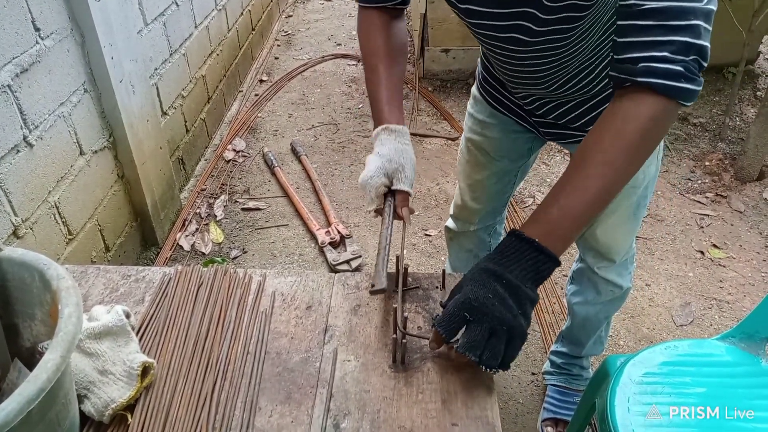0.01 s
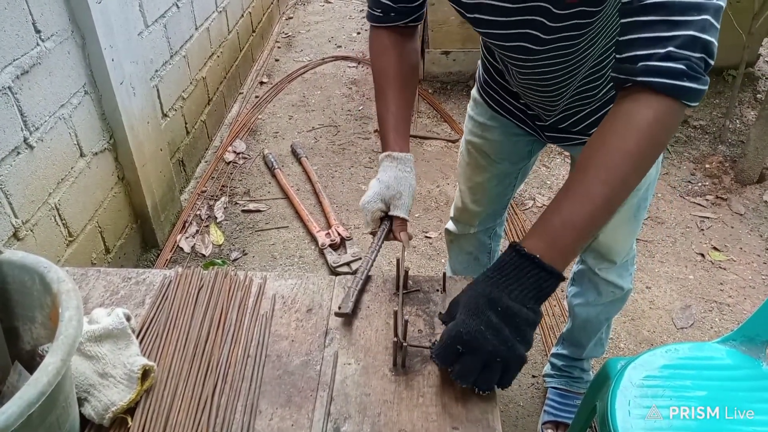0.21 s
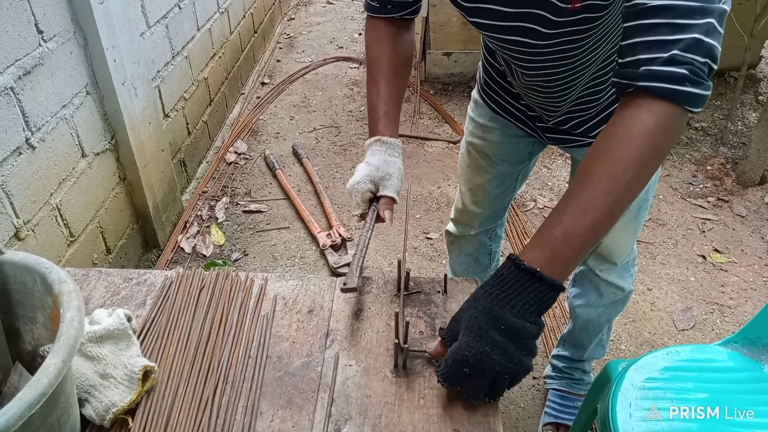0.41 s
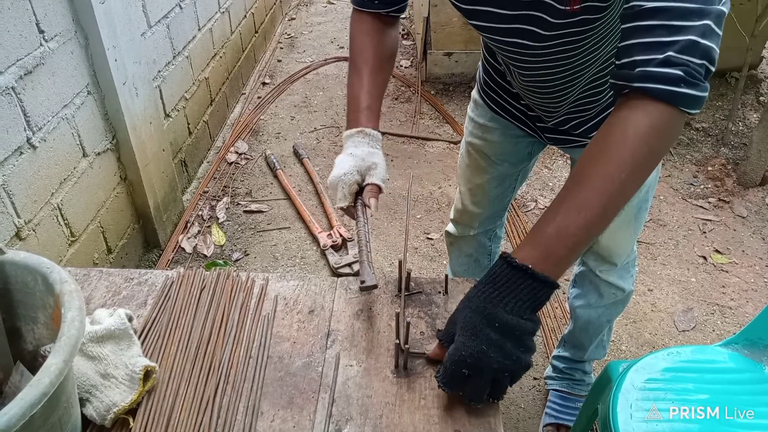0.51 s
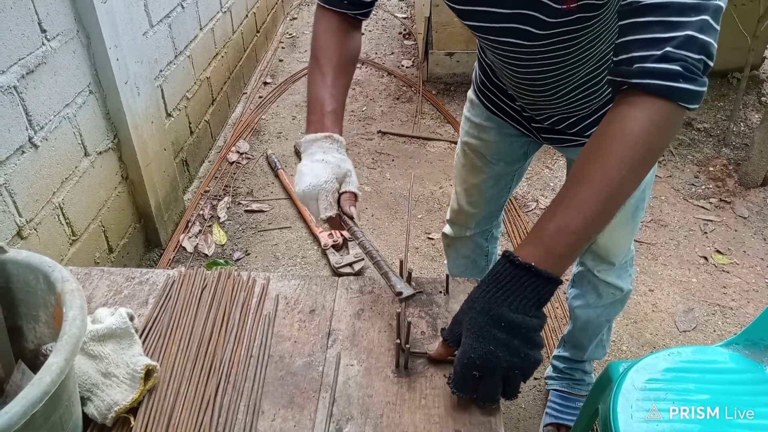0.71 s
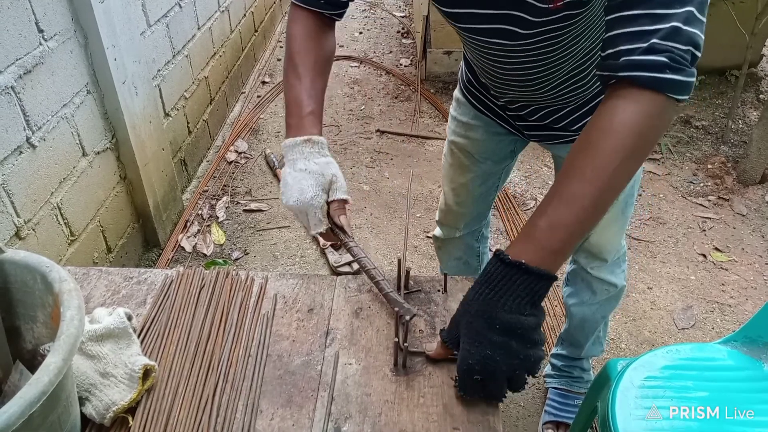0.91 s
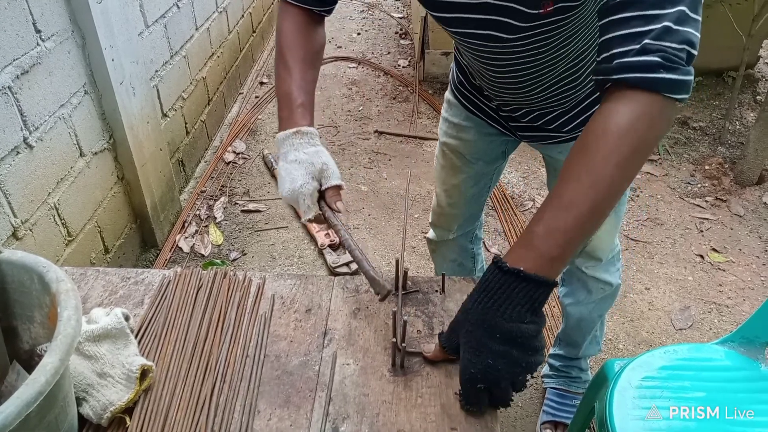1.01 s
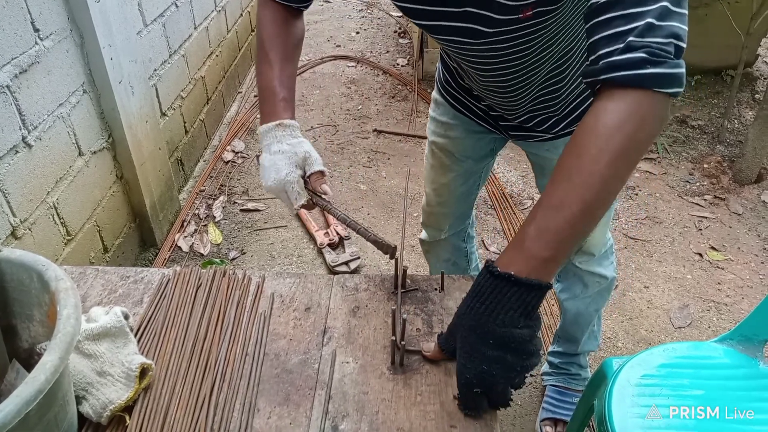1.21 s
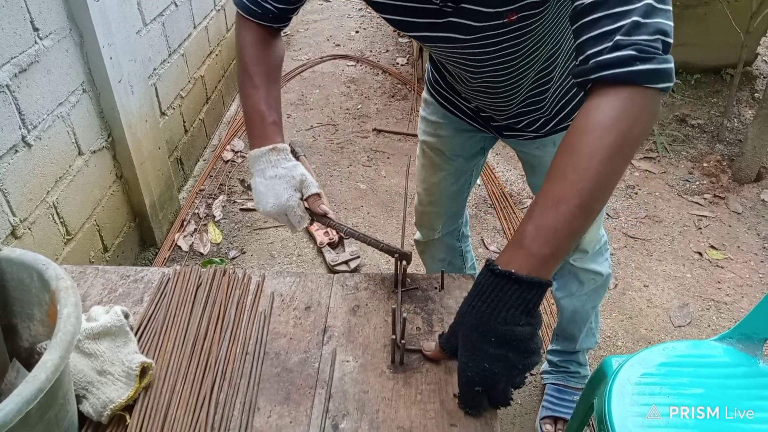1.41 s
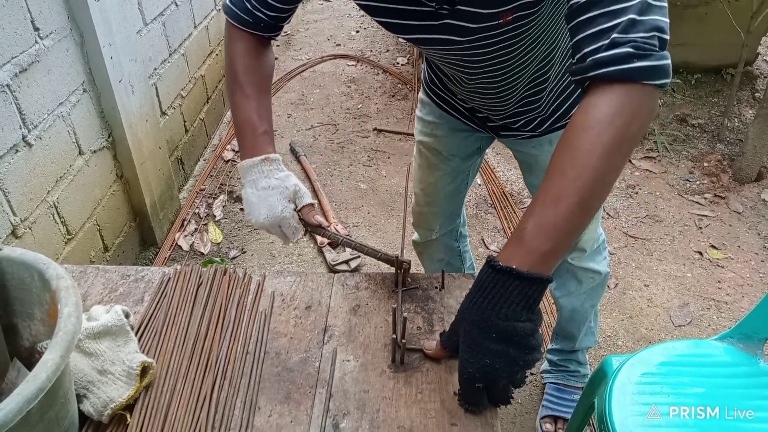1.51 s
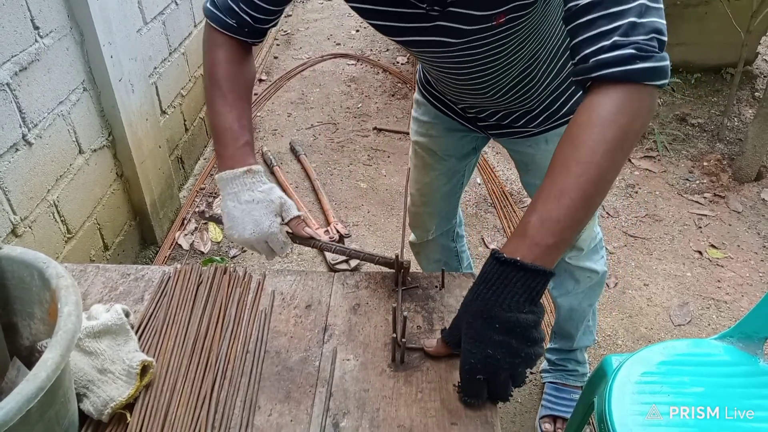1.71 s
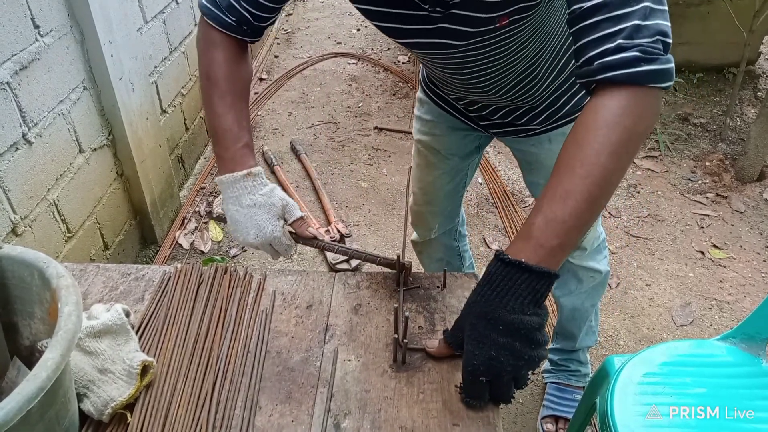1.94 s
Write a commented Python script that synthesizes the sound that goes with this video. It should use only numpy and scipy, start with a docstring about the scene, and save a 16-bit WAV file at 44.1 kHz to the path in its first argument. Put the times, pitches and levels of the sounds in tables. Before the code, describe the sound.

Steel clinks on a wooden bench outdoors, heard close. A thin bar scrapes and squeaks softly at first, then a heavy dull thump lands at 0.2 seconds and a lighter wooden knock near 0.55. A bright clank rings at 0.85, a short tap at 1.25, then bouncing clinks from 1.45 run into a dense rattle around 1.6 to 1.65. Faint uneven hiss, low hum, tiny distant whistles and weak echo.

```python
"""At a wooden bench outdoors, a steel bending key is fitted onto a thin reinforcing bar between pins.
The key clinks, is tapped, bounces on a pin and rattles home: fading sine tones plus bursts of noise.
The bar slides and thumps on the bench: uneven noise, gliding squeaks and dull wooden tones.
Behind lie a weak echo, low air noise, a hiss whose level dips and recovers, a wavering low hum
and faint whistles."""
import sys
import numpy as np
from scipy import signal
from scipy.fft import rfft, irfft, next_fast_len
from scipy.io import wavfile
from scipy.ndimage import uniform_filter1d, minimum_filter1d, map_coordinates

SR = 44100
rng = np.random.default_rng(int(sys.argv[2]) if len(sys.argv) > 2 else 0)


def unload_audio(sound):
    """Save the sound as a 16-bit wav file, at the path given as the first command line argument."""
    columns = np.transpose(np.atleast_2d(sound))
    # keep every value between -1 and 1, then stretch to whole-number steps
    steps = np.round(np.clip(columns, -1, 1) * 32767)
    wavfile.write(sys.argv[1], SR, steps.astype(np.int16))


N = 85995  # samples in the scene

# dull thud of the bench, under steel contacts and wood blows alike: [f/Hz, relative level per Hz/dB]
THUD = [(25, -44), (55, -36), (110, -14.5), (200, -3.5), (470, -4), (560, -23.5), (640, -7), (850, -11.5),
        (1200, -16.5), (1800, -10.5), (3400, -13.5), (4500, -32), (7000, -66), (15000, -67)]
THUD_RISE_S = 0.0005


def amp(db):
    """Turn decibels into a gain."""
    return 10 ** (np.asarray(db) / 20)


def unit(x):
    """Scale a sound to an rms of 1."""
    return x / np.sqrt(np.mean(x ** 2) + 1e-20)


def along(points, hz):
    """Read a curve of (Hz, value) points on a log frequency axis."""
    f, v = np.transpose(points)
    return np.interp(np.log(hz + 1), np.log(f + 1), v)


def filtered(x, response):
    """Multiply the spectrum of x by a response that depends on frequency."""
    size = next_fast_len(len(x) + 8192)
    hz = np.fft.rfftfreq(size, 1 / SR)
    return irfft(rfft(x, size) * response(hz), size)[:len(x)]


def noise(spectrum, size):
    """Colour white noise with a spectrum and scale it to an rms of 1."""
    white = rng.standard_normal(size)
    return unit(filtered(white, lambda hz: amp(along(spectrum, hz))))


def wobble(rate):
    """A smooth random curve through `rate` random points a second."""
    knots = rng.standard_normal(4096)
    return map_coordinates(knots, [np.arange(N) * rate / SR], mode="wrap")


def add(track, s, sound):
    """Mix a sound into the track at s seconds."""
    part = track[max(0, round(s * SR)):][:len(sound)]
    part += sound[:len(part)]


def fade(t60, rise, hold=0):
    """Half a second of fast rise, brief hold and exponential decay (60 dB in t60 seconds)."""
    t = np.arange(SR // 2) / SR
    decay = np.exp(-np.log(1000) * np.maximum(t - hold, 0) / t60)
    return decay * (1 - np.exp(-t / rise))


def ring(modes, length, disorder):
    """A struck body rings in fading sine tones; disorder (0-1) scatters their starting phases."""
    rise_s, scatter_db = 0.00066, 3.1  # each blow excites the modes a little differently
    t = np.arange(SR // 2) / SR
    out = np.zeros(SR // 2)
    for k, (hz, db, t60) in enumerate(modes):
        level = (-1) ** k * amp(db + scatter_db * rng.standard_normal())  # signs alternate
        wave = np.sin(2 * np.pi * (hz * t + disorder * rng.random()))
        out += level * fade(t60 * length, rise_s) * wave
    return out


def burst(spectrum, t60, rise):
    """Noise stands for crowded modes, fed while the contact chatters; the treble dies first."""
    chatter_s = 0.0018
    treble_hz, treble_life = 4450, 0.69  # crossover; share of the t60 that is left above it
    crowd = noise(spectrum, size=SR // 2)
    treble = filtered(crowd, lambda hz: 1 - 1 / (1 + (hz / treble_hz) ** 10))
    low_part = (crowd - treble) * fade(t60, rise, hold=chatter_s)
    return low_part + treble * fade(t60 * treble_life, rise, hold=chatter_s)


def tone(length, hz, sag, jitter):
    """A wavering tone that swells and fades; its pitch sinks by the share `sag` a second."""
    flutter_db, flutter_per_s = 3.2, 72.4
    t = np.arange(SR // 2) / SR
    pitch = hz * (1 - sag * t + jitter * wobble(150)[:len(t)])
    swell = np.sqrt(np.abs(np.sin(np.pi * np.clip(t / length, 0, 1))))
    flutter = amp(flutter_db * wobble(flutter_per_s)[:len(t)])
    return np.sqrt(2) * swell * flutter * np.sin(2 * np.pi * np.cumsum(pitch) / SR)


def tones(rows, sag, jitter):
    """Place all the short tones of one table at their times."""
    out = np.zeros(N)
    for s, length, hz, db in rows:
        add(out, s, amp(db) * tone(length, hz, sag, jitter))
    return out


def steel():
    """Each contact rings a steel part, with one frequency in focus, and jolts the bench under it."""
    # ringing of bar, key and pin, and of all pressed together on the bench as one jig,
    # before each contact adjusts it: [f/Hz, level/dB, t60/s]
    bar = [(322.3, -14.5, 0.22), (483, -13.5, 0.16), (958, -28.5, 0.36), (1039, -15, 0.14),
           (1332, -13, 0.11), (1748, -15, 0.18), (2040, -20.5, 0.22), (2350, -18.5, 0.15),
           (2998, 1.5, 0.15), (3173, -17, 0.086), (3250, -20, 0.31), (3556, -16, .13), (3630, -13, .15),
           (3765, -5, 0.15), (4710, -18.5, 0.083), (9250, -45, .17)]
    key = [(700.4, -5, 0.16), (758, -11.5, 0.27), (786, -18.5, 0.35), (1740, -3, 0.099), (2263, -1, 0.086),
           (2163, -17.5, 0.17), (2627, 1, 0.091), (2684, 4, 0.098), (3530, 1, 0.07), (3670, -5, .06),
           (3980, -10.5, .05), (4210, -4.5, 0.032), (4840, -15, 0.1), (6750, -29, 0.12),
           (9110, -36.5, 0.11), (11550, -26, 0.12), (14360, -35.5, .11)]
    pin = [(804.6, -15, 0.25), (1362, -21.5, 0.16), (1690, -14.5, 0.099), (1973, -10, .14),
           (1970, -25.5, 0.097), (2126, -11, 0.12), (2204, -1, 0.069), (2304, -6, 0.038), (2850, 0, 0.089),
           (2970, -6.5, 0.077), (3263, -2.5, 0.085), (3300, -2, .07), (3460, -7.5, .06), (4062, 3.5, 0.044),
           (4087, 0, 0.057)]
    jig = [(148, -13.5, 0.17), (281, -6, 0.29), (420, -14, 0.097), (774.6, -7.5, 0.15), (938, -4, .07),
           (997, -1.5, 0.05), (1357, -8, 0.16), (1425, -21, .24), (1794, 1.5, .09), (2300, -17, .15),
           (2583, -2.5, .065), (3320, -10, .07), (3520, 1, 0.13), (3711, -3, 0.088), (4060, 0.5, 0.044)]
    # dense short clatter of the same parts, before the focus: [f/Hz, relative level per Hz/dB]
    bar_clatter = [(50, -54), (150, -32), (600, -19.5), (850, -5), (1200, -17), (1800, -11.5), (2700, 1),
                   (3600, 3), (4400, -12), (5300, -30), (7000, -34), (8500, -41), (12500, -40.5),
                   (14500, -53), (15600, -61.5)]
    key_clatter = [(50, -52), (150, -29), (600, -28.5), (850, -9.5), (1250, -23.5), (1800, -9.5),
                   (2600, 2.5), (3200, 0), (4200, 7.5), (5300, -22.5), (7200, -41.5), (8500, -34),
                   (11500, -35), (14500, -42.5), (15600, -61.5)]
    pin_clatter = [(50, -56.5), (170, -54), (330, -11.5), (480, -10.5), (620, -35), (850, -10),
                   (1300, -22.5), (2100, 1.5), (2550, -4.5), (3100, 2), (3750, -8), (4200, -5), (4700, -18),
                   (5200, -15.5), (5700, -34.5), (6500, -24), (8500, -39.5), (11500, -45.5), (15500, -58)]
    jig_clatter = [(60, -39), (140, -10.5), (480, 7), (560, -12.5), (640, -33.5), (760, -2), (960, 2.5),
                   (1100, -11.5), (1230, -41), (1330, -6), (1520, -19), (1760, -4.5), (2150, -7), (3500, 2),
                   (4150, -8), (4900, -21.5), (5700, -33), (6700, -31.5), (8400, -53), (9400, -41.5),
                   (12000, -52.5), (15500, -57)]
    # steel contacts: [t/s, part, ring level/dB, clatter level/dB, clatter t60 below the treble/s,
    # bench thud level/dB, ring length/share, focus f/Hz, drop away from the focus/dB per octave]
    contacts = [(0.486, "key", -49, -37.5, 0.074, -43, 1, 3500, -4),
                (0.8393, "bar", -11.5, -12, 0.11, -23.5, 0.97, 3200, 0),
                (0.8481, "bar", -40, -18.5, 0.17, -26.5, 0.66, 3200, 0),
                (1.2638, "key", -12, -9.5, 0.052, -24, 0.7, 3300, -0.5),
                (1.4505, "pin", -12, -14.5, 0.1, -37, 0.8, 2420, -2),
                (1.4946, "pin", -21, -22, 0.13, -36.5, 0.88, 3840, -2),
                (1.5228, "pin", -27.5, -25.5, 0.13, -38, .7, 3290, 6),
                (1.5445, "pin", -21, -20.5, 0.1, -37, 0.84, 2550, 6),
                (1.6022, "jig", -21, -25.5, 0.095, -21, 0.53, 3000, 2.5),
                (1.6112, "jig", -25.5, -17.5, 0.076, -34.5, .8, 3200, 4.5),
                (1.617, "jig", -25.5, -13, 0.16, -26.5, 1, 2000, 2),
                (1.6335, "pin", -16, -27, .06, -43.5, 1.4, 3150, 12.5),
                (1.6378, "jig", -21.5, -36, 0.042, -30, 0.69, 3000, 3),
                (1.646, "jig", -18, -16, 0.04, -35, 0.55, 2500, 3.5),
                (1.6538, "jig", -20.5, -15, 0.11, -25, 1.18, 3000, 0)]
    parts = {"bar": (bar, bar_clatter), "key": (key, key_clatter),
             "pin": (pin, pin_clatter), "jig": (jig, jig_clatter)}

    def focused(table, centre_hz, focus_db):
        """Lower the levels by focus_db per octave away from the centre; a negative value lifts them."""
        return [(hz, db - focus_db * abs(np.log2(hz / centre_hz)), *rest) for hz, db, *rest in table]

    out = np.zeros(N)
    for s, part, ring_db, clatter_db, t60, thud_db, length, centre_hz, focus_db in contacts:
        modes, spectrum = (focused(table, centre_hz, focus_db) for table in parts[part])
        ringing = amp(ring_db) * ring(modes, length, disorder=1)
        clatter = amp(clatter_db) * burst(spectrum, t60, rise=0.00013)
        jolt = amp(thud_db) * burst(THUD, t60=0.13, rise=THUD_RISE_S)
        add(out, s, ringing + clatter + jolt)
    return out


def wood():
    """Dull blows on the bench top: a soft push, its low modes and a thud."""
    # the bench, and its top knocked lightly at another spot,
    # before each blow adjusts it: [f/Hz, level/dB, t60/s]
    bench = [(146, -2.5, 0.053), (212.4, -11, 0.098), (320, -4.5, 0.092), (340, -4.5, 0.12),
             (420.3, 1.5, 0.083), (475.2, -4, 0.13), (767, -16, 0.23), (864, -13.5, .09), (917, -8.5, 0.1)]
    plank = [(320, 4, 0.057), (346.5, -0.5, 0.16), (812, -8, 0.043), (936, -5.5, 0.057), (1120, -26, 0.12),
             (1288, -9, 0.042), (1556, -18, 0.073), (2110, -28, 0.21), (3106, -20, .09)]
    # blows: [t/s, part, ring level/dB, thud level/dB, thud t60 below the treble/s,
    # ring length/share, push level/dB]
    knocks = [(0.2094, "bench", -12, -19, 0.17, .95, -2.5), (.2245, "bench", -27.5, -16.5, 0.074, .8, -31),
              (.5615, "plank", -15.5, -31, 0.16, 0.88, -27), (.664, "plank", -48, -46.5, 0.2, .8, -54)]
    parts = {"bench": bench, "plank": plank}
    push_s = 0.00105  # time scale of the push
    u = np.arange(SR // 2) / SR / push_s - np.pi
    push = (1 - 2 * u * u) * np.exp(-u * u)  # one smooth hump with a dip on each side
    out = np.zeros(N)
    for s, part, ring_db, thud_db, t60, length, push_db in knocks:
        ringing = amp(ring_db) * ring(parts[part], length, disorder=0)
        thud = amp(thud_db) * burst(THUD, t60, THUD_RISE_S)
        add(out, s, ringing + thud + amp(push_db) * push)
    return out


def sliding():
    """Uneven slips rasp on the wood, crush sand grains and make the bar sing faintly."""
    # strokes of the bar: [start t/s, length/s, rasp level/dB, squeal level/dB]
    slides = [(0, 0.11, -40.5, -37), (0.105, 0.1, -45, -43.5), (0.18, 0.062, -35.5, -32.5),
              (0.293, 0.056, -41.5, -62), (0.479, 0.045, -42, -47), (0.509, 0.041, -35, -59),
              (0.661, .02, -45, -60), (0.801, 0.033, -53.5, -54), (0.946, 0.11, -45, -48)]
    # colour of the rasp: [f/Hz, relative level per Hz/dB]
    rasp_colour = [(80, -40.5), (200, -6.5), (450, 3), (620, 0.5), (850, 4), (1300, -1), (2200, -5),
                   (3500, -3.5), (4500, -28.5), (6000, -33), (10000, -53), (15000, -44)]
    # resonances of the singing bar: [f/Hz, width/Hz, relative level/dB]
    resonances = [(2150, 250, -15), (2710, 130, -8.5), (3056, 162, -5.5), (3564, 201, -2), (3690, 122, -1),
                  (4255, 295, -15.5)]
    rise_s, fall_s = 0.012, 0.04  # the fall is centred on the end of the stroke
    slips_per_s, slip_db = 130, 2
    grit_per_s, grit_db = 130, -12  # crushed grains, level against the rasp
    t = np.arange(N) / SR
    slips = amp(slip_db * wobble(slips_per_s))
    grains = (rng.random(N) < grit_per_s / SR) * rng.standard_normal(N)
    grit = unit(filtered(grains, lambda hz: amp(along(rasp_colour, hz))))
    rasp = unit(slips * noise(rasp_colour, size=N)) + amp(grit_db) * grit

    def body(f):
        """Sum the bar's resonances, with alternating signs."""
        return sum((-1) ** k * amp(db) * 1j * f * width / (centre * centre - f * f + 1j * f * width)
                   for k, (centre, width, db) in enumerate(resonances))

    squeal = unit(filtered(slips * rng.standard_normal(N), body))
    out = np.zeros(N)
    for s, length, rasp_db, squeal_db in slides:
        start = np.clip((t - s) / rise_s, 0, 1)
        stop = np.clip((s + length - t) / fall_s + .5, 0, 1)
        out += start * stop * (amp(rasp_db) * rasp + amp(squeal_db) * squeal)
    return out


def squeaks():
    """The sliding bar squeaks; the pitches sink as its free end grows."""
    # squeaks: [start t/s, length/s, starting f before jitter/Hz, level before swell and flutter/dB]
    rows = [(0, .11, 3060, -40), (0, .105, 3760, -38), (.003, .035, 3600, -34), (.04, .04, 4360, -46),
            (.095, .08, 2850, -42), (.13, .065, 1375, -41), (.11, .08, 5310, -58), (.095, .12, 2005, -42)]
    return tones(rows, sag=.25, jitter=.008)  # shares of the pitch; sag is per second


def yard(x):
    """A short echo from the walls: fading noise that dies at a different speed in each band."""
    # echo decay: [f/Hz, t60/s]
    decay = [(150, 0.17), (1000, 0.32), (3000, 0.28), (10000, .12)]
    hz, t, bands = signal.stft(rng.standard_normal(SR // 2), SR, nperseg=256)
    fading = bands * np.exp(-np.log(1000) * t / along(decay, hz)[:, None])
    tail = signal.istft(fading, SR, nperseg=256)[1]
    return signal.fftconvolve(x, tail / np.linalg.norm(tail))[:N]


def air():
    """Low air noise: steady noise, mostly bass."""
    # colour of the air noise: [f/Hz, relative level per Hz/dB]
    colour = [(20, -42), (48, -17), (66, 6.5), (102, -7), (135, -4), (200, -5.5), (270, -17.5), (341, -3),
              (394, -25.5), (472, -11.5), (600, -18.5), (1000, -28.5), (1500, -31.5), (2200, -15),
              (3300, -74.5)]
    return amp(-50.5) * noise(colour, size=N)


def swelling_hiss():
    """Hiss whose level dips and recovers, with a steady fizz on top: two layers of coloured noise."""
    # colours of the changing hiss and the steady fizz: [f/Hz, relative level per Hz/dB]
    hiss_colour = [(820, -75), (1400, -45), (1820, -25.5), (1910, -5.5), (2050, -18), (2200, -0.5),
                   (2640, -8), (3130, 1), (3990, -3), (5180, -37), (5610, -22.5), (6330, -41), (6930, -20),
                   (7820, -26.5), (8480, -70), (10700, -50.5), (11700, -34), (12700, -52), (15500, -48.5)]
    fizz_colour = [(1000, -31.5), (3500, 5.5), (5200, -10.5), (7200, -2), (8500, -31), (10800, -33),
                   (12000, -12), (13000, -24), (14000, -16), (15500, -25)]
    # dips and recoveries of the hiss: [t/s, level/dB]
    hiss_level = [(0, -46.5), (.3, -46), (.44, -43), (.6, -45), (.7, -55.5), (.78, -58.5), (.84, -64),
                  (.95, -48), (1.1, -49.5), (1.24, -44), (1.32, -40), (1.42, -50), (1.58, -48.5),
                  (1.72, -46.5), (1.85, -43.5), (1.95, -44.5)]
    t = np.arange(N) / SR
    level = amp(np.interp(t, *np.transpose(hiss_level)))
    return level * noise(hiss_colour, size=N) + amp(-60.5) * noise(fizz_colour, size=N)


def hum():
    """A low tone and its octave waver together in pitch and loudness."""
    hum_hz, first_db, octave_db = 67.1, -55.5, -57.5  # middle pitch; levels before the wavering
    t = np.arange(N) / SR
    phase = 2 * np.pi * hum_hz * t + 0.78 * wobble(7.22)
    loudness = np.sqrt(2) * amp(2.6 * wobble(3.7))
    return loudness * (amp(first_db) * np.sin(phase) + amp(octave_db) * np.sin(2 * phase))


def whistles():
    """Faint thin whistles far off: short tones that sink slightly."""
    # whistles: [start t/s, length/s, starting f before jitter/Hz, level before swell and flutter/dB]
    rows = [(.22, 0.11, 5560, -62), (.31, 0.039, 5700, -64), (.93, 0.23, 5860, -62.5),
            (1.66, 0.093, 5850, -65)]
    return tones(rows, sag=.09, jitter=.003)  # shares of the pitch; sag is per second


def scene():
    """The work at the bench, its weak echo and the background."""
    echo_db = -20
    work = steel() + wood() + sliding() + squeaks()
    background = air() + swelling_hiss() + hum() + whistles()
    return (work + amp(echo_db) * yard(work) + background)[None]


def record(dry):
    """Cut the deepest bass, turn the highest peaks down and remove everything above the top frequency."""
    low_cut_hz, top_hz = 43.3, 15600
    ceiling = .85  # peak limit ahead of the top cut, full scale = 1
    lean = signal.sosfilt(signal.butter(2, low_cut_hz, "high", fs=SR, output="sos"), dry[0])
    needed = np.minimum(1, ceiling / (np.abs(lean) + 1e-9))
    # the gain dips around each peak (windows of 131 samples, 3 ms)
    gain = uniform_filter1d(minimum_filter1d(needed, size=131), size=131)
    return filtered(lean * gain, lambda hz: hz < top_hz)[None]


dry = scene()
out = record(dry)
unload_audio(out)
```